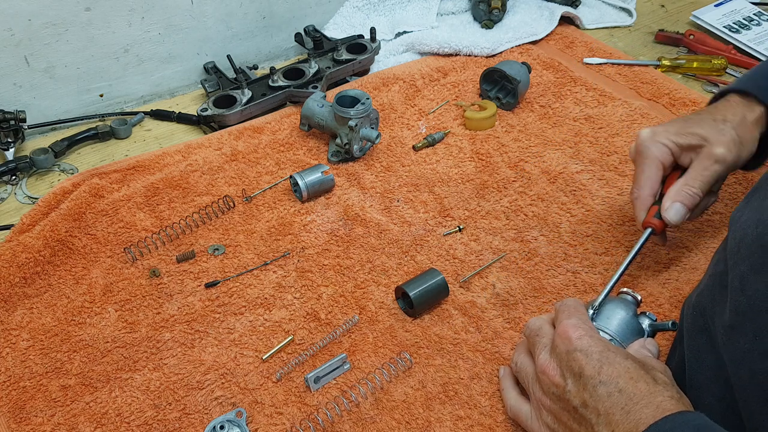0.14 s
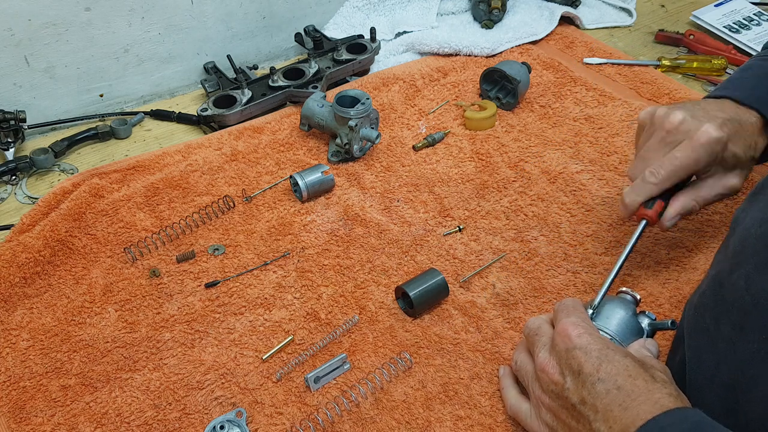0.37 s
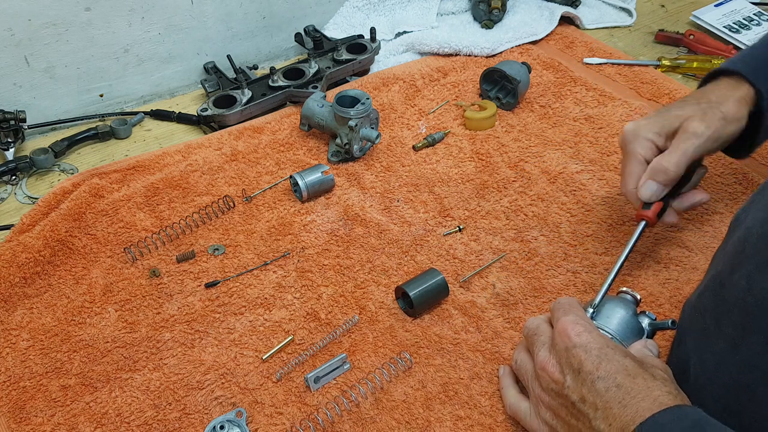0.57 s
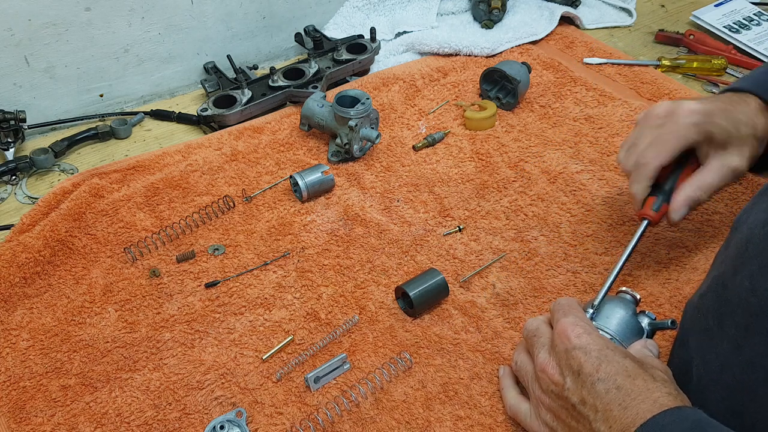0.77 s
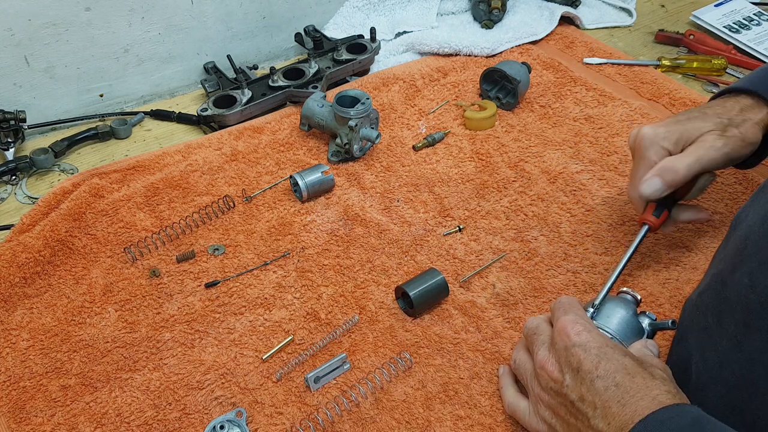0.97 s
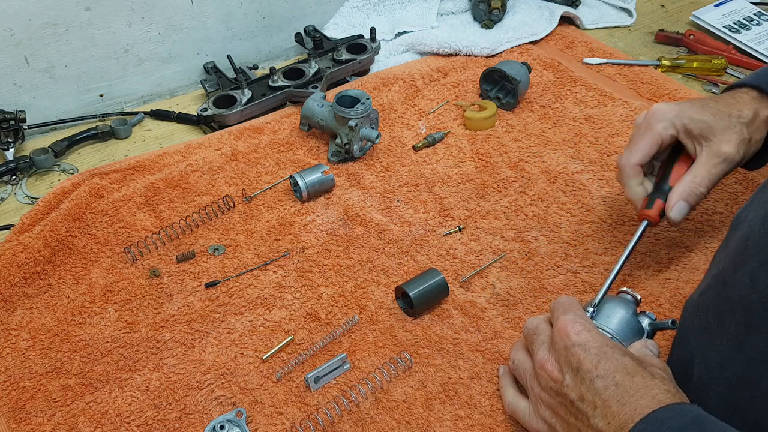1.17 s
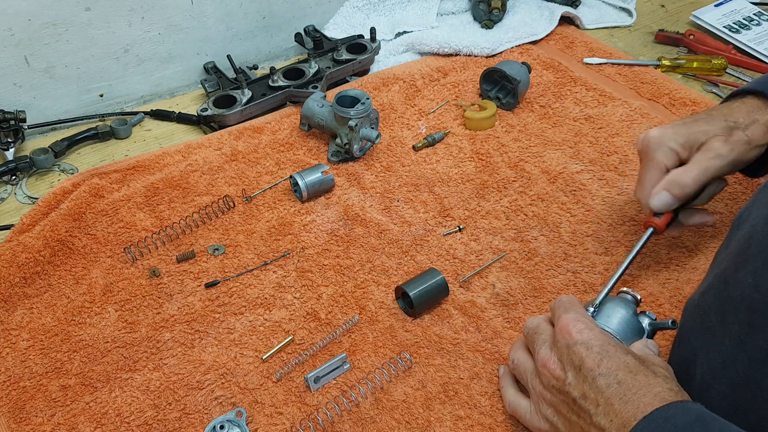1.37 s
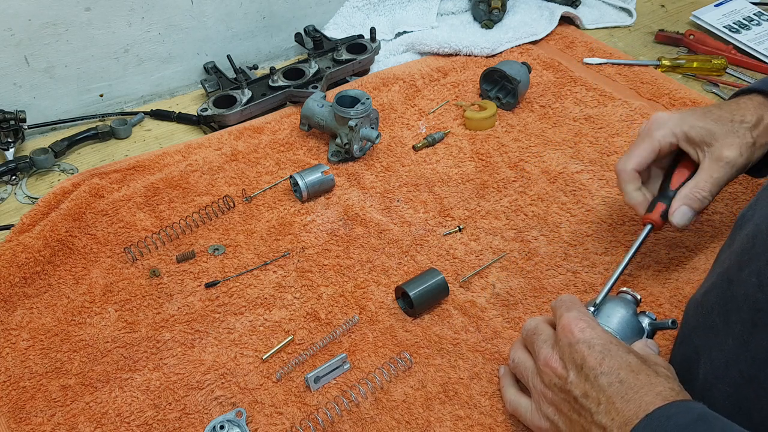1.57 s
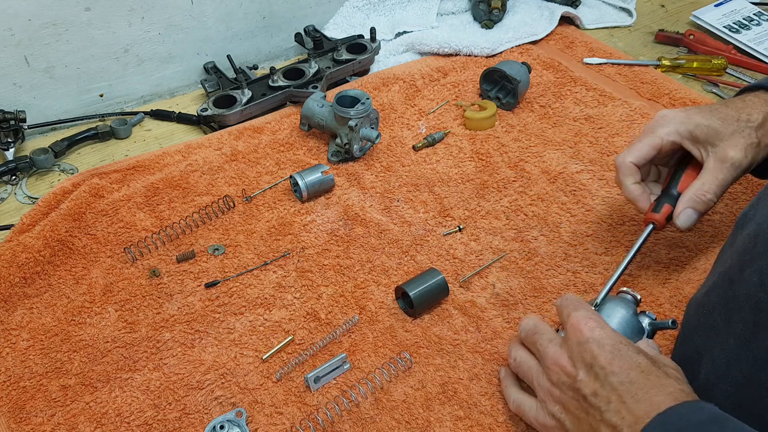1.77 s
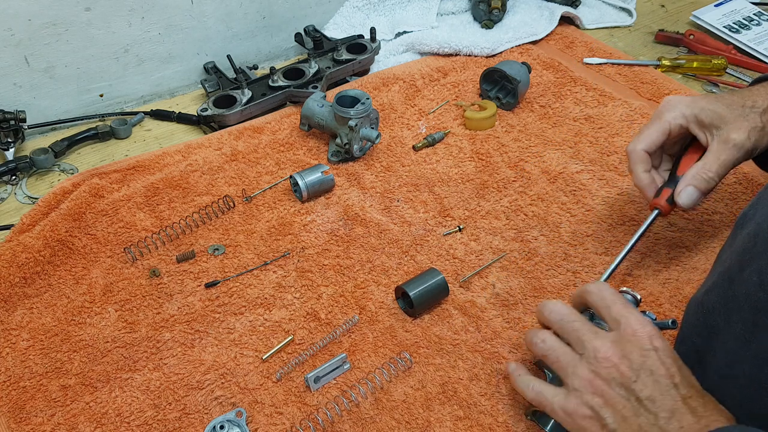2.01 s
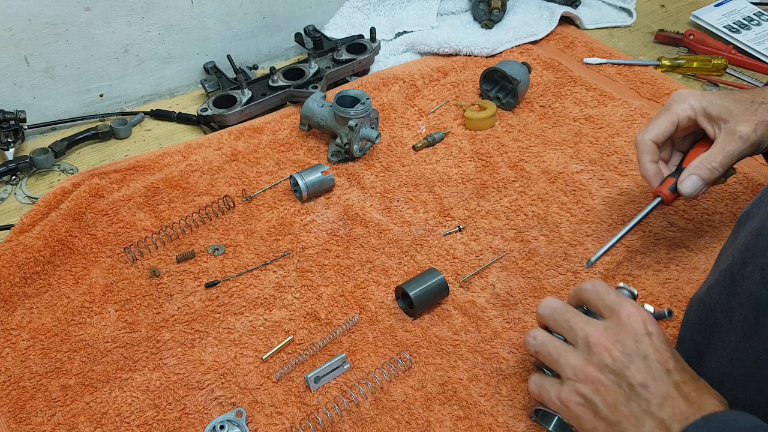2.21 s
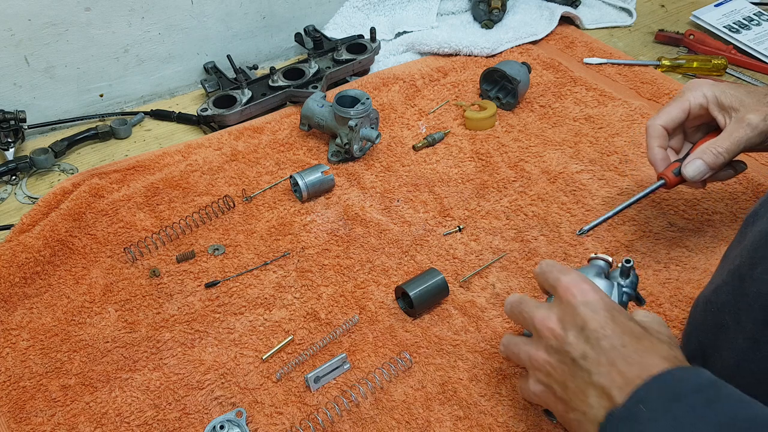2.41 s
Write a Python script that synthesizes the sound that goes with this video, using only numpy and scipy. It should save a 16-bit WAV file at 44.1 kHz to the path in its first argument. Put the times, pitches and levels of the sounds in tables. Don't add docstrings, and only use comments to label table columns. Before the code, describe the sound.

A screwdriver on a metal carburettor clicks hard at about 0.25 s, bright and briefly ringing, with a low bench thump. A second, woodier crack comes at 0.5 s and a duller double knock near 0.78 s. Muffled towel rubs follow at 1.1-1.2 s, short scuffs around 1.45 s and at 1.95 s, with faint ticks until 2.36 s. Small room, close stereo microphone, low rumble, steady hiss.

```python
import sys
import numpy as np
from scipy import signal
from scipy.fft import rfft, irfft
from scipy.io import wavfile
from scipy.ndimage import uniform_filter1d

SR = 44100
rng = np.random.default_rng(int(sys.argv[2]) if len(sys.argv) > 2 else 0)


def generate_wav(sig):
    pcm = np.round(np.clip(np.atleast_2d(sig).T, -1, 1) * 32767).astype(np.int16)
    wavfile.write(sys.argv[1], SR, pcm)


def voltage_ratio(level):
    return 10 ** (np.asarray(level, float) / 20)


N = 108045


def table(points, hz):
    p = np.array(points, float)
    return np.interp(np.log(np.maximum(hz, 1)), np.log(p[:, 0]), p[:, 1])


def colour(x, points):
    hz = np.arange(x.shape[-1] // 2 + 1) * SR / x.shape[-1]
    gain = voltage_ratio(table(points, hz)) * np.minimum(hz / points[0][0], 1) ** 2
    rms_gain = np.sqrt(np.mean(gain ** 2))
    return irfft(rfft(x) * gain / rms_gain, x.shape[-1])


def ring(x, hz, t60):
    decay = np.log(1000) / (max(t60, .005) * SR)
    pole = np.exp(2j * np.pi * hz / SR - decay)
    return signal.lfilter([1], [1, -pole], x).imag


def band(x, hz, width):
    return signal.lfilter(*signal.iirpeak(hz, hz / width, fs=SR), x)


def walk(rate):
    hold = int(SR / rate)
    steps = np.repeat(rng.standard_normal(N // hold + 1), hold)
    return 2.12 * uniform_filter1d(steps, hold)[:N]


# [t/s, level/dB]
TICKS = [
    [(.2420, -20), (.2446, -24), (0.2488, -34), (.2535, -33.5), (.259, -34.5), (.412, -50.5), (.478, -50.5)],
    [(0.5085, -27), (.5097, -21.5), (.5135, -33.5), (0.5184, -32.5), (.526, -40), (.668, -54)],
    [(0.7718, -41.5), (.7808, -32.5), (.7845, -34.5), (.7875, -37), (.7900, -36.5), (.80, -36)],
    [(1.53, -67), (1.945, -57.5), (1.961, -67), (2.363, -59)],
    [(1.313, -61), (.7808, -41.5), (.7861, -53)],
]
# [f/Hz, level/dB, T60/s]
RINGS = [
    [(2690, -9.5, 0.017), (2810, -1, 0.026), (2940, -3.5, 0.04), (3160, -2.5, 0.021), (3290, -7, 0.027),
     (3595, -0.5, 0.02), (4800, -1, 0.017), (5190, 7, 0.019), (6820, 6.5, 0.0038), (10300, 6, 0.0069)],
    [(908, -16, .04), (1356, -6.5, 0.024), (470, -7, 0.14), (1460, 4.5, 0.015), (5220, -6, 0.0042),
     (1660, -7.5, .02), (2600, -19, 0.011), (3327, 1.5, 0.015), (4250, -8, 0.0097), (3600, -25, 0.018),
     (9100, -14, 0.014)],
    [(638, -7, 0.055), (950, -10.5, 0.082), (2026, -12.5, 0.031), (2760, -3.5, 0.014), (4200, -15, 0.015)],
    [(2320, 6, 0.01), (4400, 1, 0.013), (5560, 2, 0.025), (9130, 12.5, 0.011)],
    [(6360, 9.5, 0.0048)],
]
RING_LEVELS = [-12.5, -10, -6.5, -2.5, 1]
# [f/Hz, level/dB]
CRACKS = [
    [(1000, -8.5), (2030, -20.5), (3150, 4), (3900, -2.5), (5070, 0), (5900, -18), (11000, -5),
     (16000, -23)],
    [(420, 1), (900, -1.5), (1600, -11), (3300, -6), (4500, -11.5), (6500, -18.5), (12000, -19),
     (16000, -22.5)],
    [(600, 6), (1640, -18.5), (2760, -10), (4300, -10), (6300, -28), (10000, -19.5), (16000, -18)],
    [(1500, -8), (9000, -8), (16000, -1.5)],
    [(5000, 5), (6500, 1), (16000, -4)],
]


def ticks():
    t = np.arange(N) / SR
    noise = rng.standard_normal(N)
    rise_s, decay_s = 0.00014, 0.0013
    contacts = []
    for hits, modes, ring_db, crack_points in zip(TICKS, RINGS, RING_LEVELS, CRACKS):
        envelope, kick = np.zeros(N), np.zeros(N)
        for s, db in hits:
            onset = np.clip((t - s) / rise_s, 0, 1)
            envelope += voltage_ratio(db) * np.exp(-np.abs(t - s) / decay_s) * onset
            kick[int(s * SR)] = voltage_ratio(db + ring_db)
        sound = envelope * colour(noise, crack_points)
        for j, (hz, db, t60) in enumerate(modes):
            sign = (-1) ** j
            sound += sign * voltage_ratio(db) * ring(kick, hz, t60)
        contacts.append(sound)
    return contacts


# [t/s, length/s, level/dB]
SHOVES = [
    [(1.09, 0.077, -62), (1.12, 0.049, -57), (1.145, 0.038, -48.5), (1.2, 0.061, -57), (1.43, 0.018, -61),
     (1.51, 0.03, -59.5)],
    [(.13, 0.033, -60), (0.513, 0.021, -31), (0.64, 0.018, -66), (.665, 0.056, -49.5),
     (0.785, 0.036, -47.5), (.84, .04, -60.5), (0.898, 0.066, -57), (1.12, 0.034, -43.5),
     (1.165, 0.034, -46), (1.199, 0.032, -44.5), (1.314, 0.013, -58), (1.433, 0.011, -39.5),
     (1.455, 0.012, -38), (1.478, .015, -46.5), (1.5, 0.023, -38.5), (1.6, 0.053, -65.5),
     (1.785, 0.05, -61.5), (1.86, 0.066, -61.5)],
    [(.74, 0.032, -50.5), (1.943, 0.018, -39.5), (1.96, 0.014, -40), (1.99, 0.034, -49.5),
     (2.04, 0.036, -51.5)],
    [(.244, 0.045, -31.5), (.33, 0.081, -51.5), (.52, 0.078, -58), (1.53, 0.047, -53.5)],
]
# [f/Hz, level/dB]
SURFACES = [
    [(250, -10.5), (450, -4), (1080, -6), (1700, -24.5), (3200, -27), (4000, -22), (5000, -25),
     (12000, -23.5)],
    [(230, -6), (290, -1.5), (450, -1), (700, -27), (1100, -35.5), (3000, -43), (16000, -49)],
    [(200, 4.5), (350, 6), (650, -2.5), (1500, -13), (2700, -31.5), (3900, -24), (5300, -30.5),
     (12000, -32)],
    [(150, -1.5), (295, -3.5), (400, -4.5), (600, -13.5), (900, -25), (1500, -39), (16000, -70)],
]
SHOVE_RISES = [0.013, 0.0021, 0.00079, 0.0019]
# [f/Hz, width/Hz, level/dB]
LIES = [
    [(910, 150, -20), (1060, 240, -8), (2530, 460, -3), (4090, 680, -8)],
    [(840, 220, -5.5), (1100, 220, -3.5)],
    [(780, 106, -6), (876, 55, -15), (1255, 59, -1.5), (1620, 91, -19), (3870, 170, -4), (5220, 330, -0.5)],
    [(540, 48, -9), (850, 280, -17.5)],
]
# [f/Hz, width/Hz, level/dB]
BENCH = [(199, 47, -8.5), (276.5, 14, -1), (351, 18, -10), (429.4, 37.3, -4.5), (641, 32, -4)]


def shoves():
    t = np.arange(N) / SR
    fade_s, rough_db, direct_db = 0.014, 2.5, -10
    surfaces = []
    for rows, points, rise_s, lies in zip(SHOVES, SURFACES, SHOVE_RISES, LIES):
        envelope = np.zeros(N)
        for s, length, db in rows:
            onset = np.clip((t - s) / rise_s, 0, 1)
            envelope += voltage_ratio(db) * onset * np.exp(-np.maximum(t - s - length, 0) / fade_s)
        roughness = voltage_ratio(rough_db * walk(90))
        rub = envelope * roughness * colour(rng.standard_normal(N), points)
        resonances = sum(voltage_ratio(db) * band(rub, hz, width) for hz, width, db in BENCH + lies)
        surfaces.append(voltage_ratio(direct_db) * rub + resonances)
    return surfaces


# [centre t/s, f/Hz, level/dB, half length/s]
ROCKS = [(0.173, 45, -40.5, 0.059), (0.191, 69.5, -42.5, 0.05), (0.174, 125, -58.5, 0.033),
         (0.262, 198, -37.5, 0.0076), (.27, 276, -43, .015), (2.18, 126, -54, 0.026),
         (0.265, 116, -27.5, 0.014), (0.276, 81.65, -33, 0.026), (0.284, 57.4, -22, 0.012),
         (0.293, 105, -56, 0.012), (0.337, 39.6, -37, 0.018), (0.349, 65, -36.5, 0.012),
         (0.394, 103.6, -34.5, 0.011), (0.403, 54.7, -36, 0.027), (0.526, 69.5, -37, 0.025),
         (0.529, 48.7, -35, 0.024), (0.661, 49, -35.5, 0.013), (0.755, 61.6, -42.5, 0.011),
         (0.805, 103, -35.5, 0.0074), (0.949, 52.5, -41, 0.053), (1.109, 45.5, -44, 0.032),
         (1.253, 70.9, -49, 0.11), (1.333, 50, -42, 0.043), (1.471, 56.7, -38, 0.033),
         (1.498, 70.4, -39, 0.0085), (1.744, 53.4, -39.5, 0.024), (1.887, 69.4, -55, 0.051),
         (1.926, 102.7, -43, 0.057), (1.957, 50.5, -40.5, 0.082), (2.066, 59, -40, 0.019),
         (2.172, 52.5, -34, 0.04), (2.189, 66, -48, 0.093), (2.368, 49.4, -41.5, 0.035)]
# [f/Hz, level/dB]
SWAY = [(35, 0), (55, 6.5), (80, -0.5), (108, 3), (140, -16.5), (200, -22), (450, -32), (16000, -120)]
# [t/s, level/dB]
SWAY_LEVEL = [(0, -44), (.2, -70.5), (.6, -42.5), (1.0, -49.5), (1.15, -46.5), (1.5, -50), (1.68, -56.5),
              (1.85, -44), (2.2, -56), (2.45, -54)]


def boom():
    t = np.arange(N) / SR
    swells = np.zeros(N)
    for s, hz, db, half_s in ROCKS:
        envelope = voltage_ratio(db) * np.exp(-.5 * ((t - s) / half_s) ** 2)
        swells -= envelope * np.cos(2 * np.pi * hz * (t - s))
    sway_gain = voltage_ratio(np.interp(t, *np.transpose(SWAY_LEVEL)))
    return swells + sway_gain * colour(rng.standard_normal(N), SWAY)


# [f/Hz, T60/s]
ROOM_T60 = [(250, 0.24), (1000, 0.33), (3000, 0.27), (8000, 0.21), (15000, 0.15)]


def room():
    t = np.arange(SR // 2) / SR
    delay_s, early_db, early_s, low_db = 0.0023, 5.5, 0.01, -0.5
    tail = 0
    for hz in 250 * 2. ** np.arange(7):
        mid, left, right = (band(rng.standard_normal(len(t)), min(hz, 15000), hz * 1.36) for _ in range(3))
        width = 2.68 * min(hz / 1200, 1)
        decay = voltage_ratio(-60 * t / table(ROOM_T60, hz) + low_db * (hz < 700))
        tail = tail + (mid + width * np.array([left, right])) * decay
    tail = tail * np.clip(t / delay_s, 0, 1) * voltage_ratio(early_db * np.exp(-t / early_s))
    return tail / np.sqrt(np.sum(tail ** 2, axis=1, keepdims=True))


# [centre t/s, half length/s, level/dB]
SLEEVES = [(0.344, 0.12, -67.5), (.6, 0.063, -69.5), (.95, .04, -71.5), (1.166, 0.029, -59),
           (1.32, 0.048, -69), (1.446, 0.016, -71.5), (1.522, 0.025, -65), (1.82, .04, -68),
           (1.958, 0.032, -64.5)]
# [f/Hz, level/dB]
CLOTH = [(3000, -6), (8000, -10.5), (11500, 5.5), (13000, 4), (16000, -9.5)]


def sleeves():
    t = np.arange(N) / SR
    envelope = sum(voltage_ratio(db) * np.exp(-.5 * ((t - s) / half_s) ** 2) for s, half_s, db in SLEEVES)
    both, left, right = colour(rng.standard_normal((3, N)), CLOTH)
    return envelope * (both + np.array([left, right]))


# [f/Hz, level/dB]
HISS = [(150, -11), (300, -14.5), (550, -23.5), (1500, -25.5), (4500, -30.5), (7400, -37), (10000, -26),
        (16000, -17.5)]
# [f/Hz, share]
LIKENESS = [(150, 0.32), (1000, 0.087), (5000, 0.063), (12000, 0.053)]


def hiss():
    hz = np.arange(N // 2 + 1) * SR / N
    like = np.clip(table(LIKENESS, hz), 0, 1)
    both, left, right = rfft(rng.standard_normal((3, N)))
    pair = np.sqrt(like) * both + np.sqrt(1 - like) * np.array([left, right])
    balance = voltage_ratio(np.array([[0.5], [-0.5]]) / 2)
    return balance * voltage_ratio(-60.5 + 3.5) * colour(irfft(pair, N), HISS)


# five tick contacts, then four surfaces [level/dB]
CONTACT_ROOM = [-3, 1.5, 2, 1, -4.5, 2.5, -1, -2.5, 0]


def scene():
    low = boom()
    wet = 0
    for x, room_db in zip(ticks() + shoves(), CONTACT_ROOM):
        reverb = signal.fftconvolve(x[None], room(), axes=1)[:, :N]
        wet = wet + x + voltage_ratio(room_db) * reverb
    apart = voltage_ratio(-13.5) * np.gradient(low) * SR / (2 * np.pi * 80)
    left_db, left_low_db, left_lag = .8, 2.2, 6
    left = voltage_ratio(left_db / 2) * wet[0] + voltage_ratio(left_low_db / 2) * low + apart
    right = voltage_ratio(-left_db / 2) * wet[1] + voltage_ratio(-left_low_db / 2) * low - apart
    return np.array([np.roll(left, left_lag), right]) + sleeves() + hiss()


def top_cut(x):
    return signal.sosfilt(signal.butter(12, 16950, fs=SR, output="sos"), x)


def record(dry):
    low_pass = signal.ellip(10, .2, 57, 15850, fs=SR, output="sos")
    mix = signal.sosfilt(low_pass, dry)
    return top_cut(mix)


dry = scene()
out = record(dry)
generate_wav(out)
```